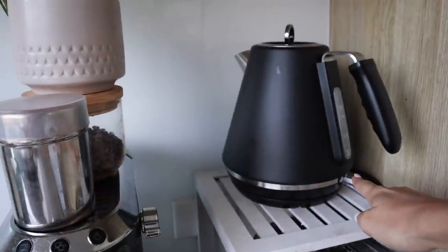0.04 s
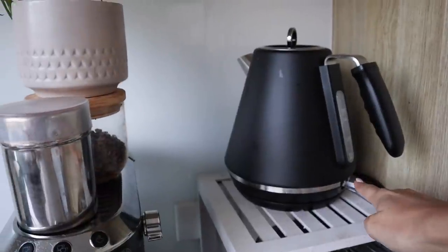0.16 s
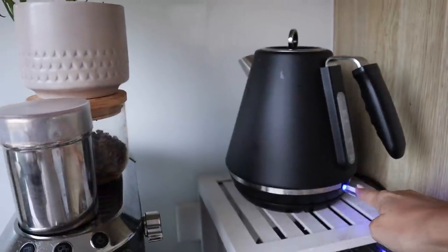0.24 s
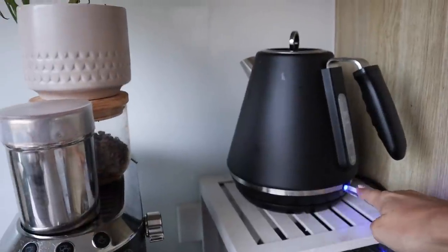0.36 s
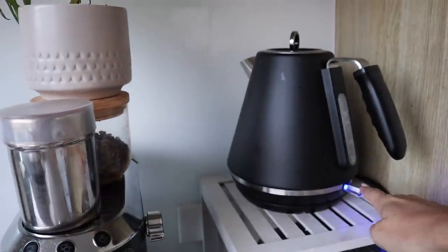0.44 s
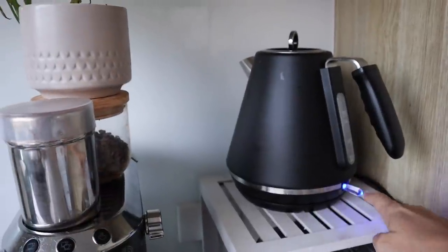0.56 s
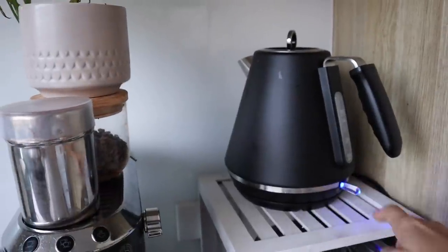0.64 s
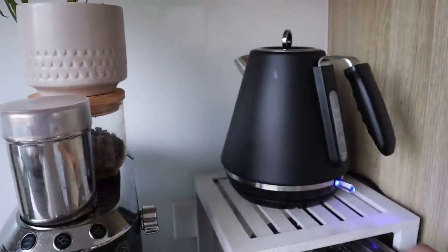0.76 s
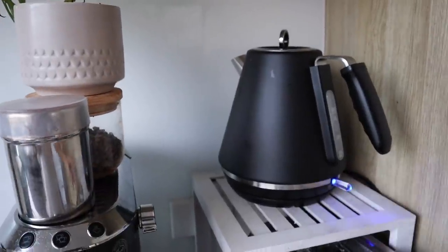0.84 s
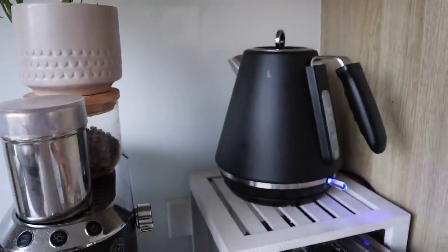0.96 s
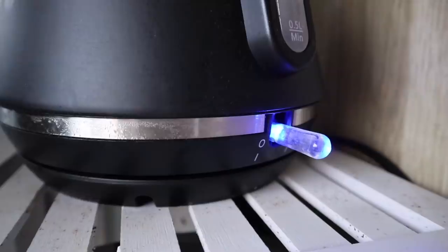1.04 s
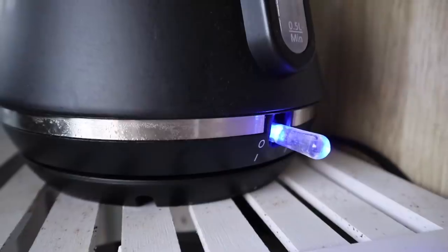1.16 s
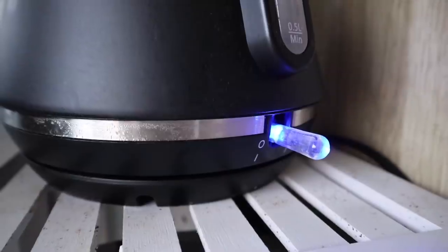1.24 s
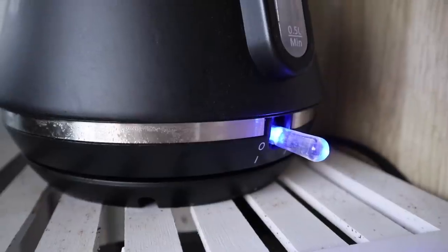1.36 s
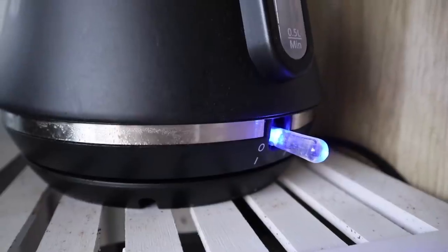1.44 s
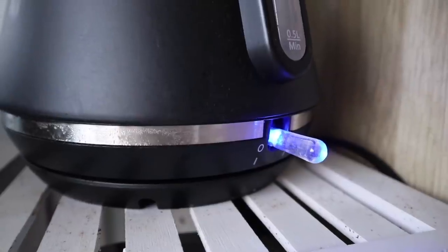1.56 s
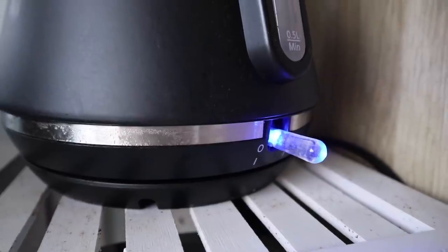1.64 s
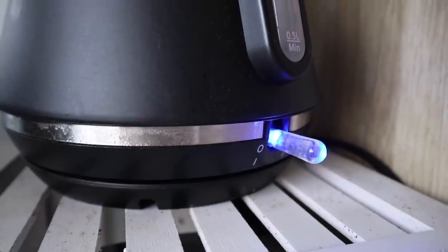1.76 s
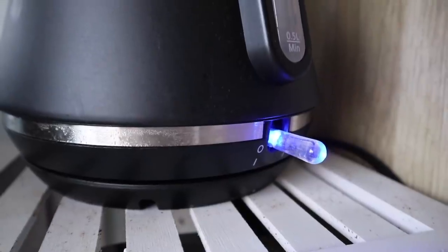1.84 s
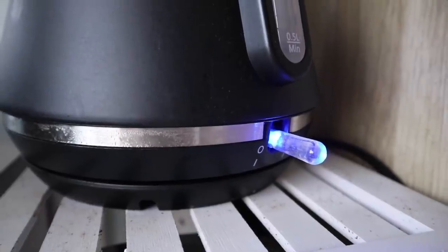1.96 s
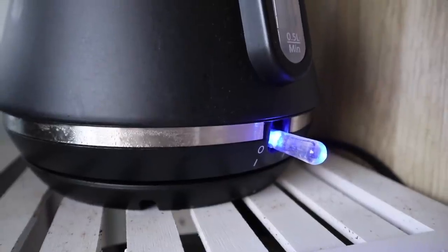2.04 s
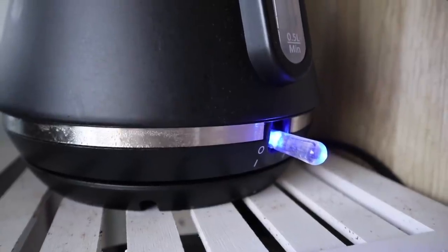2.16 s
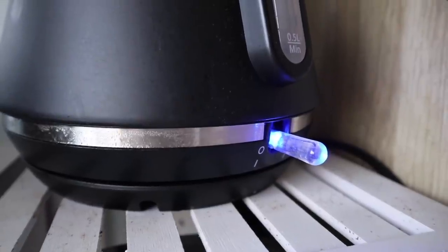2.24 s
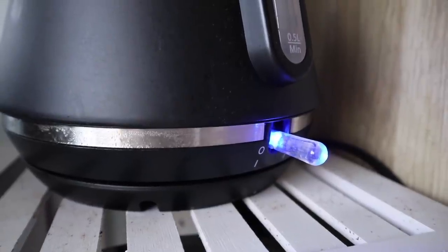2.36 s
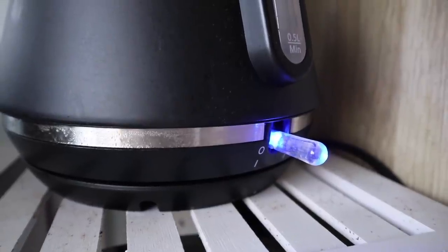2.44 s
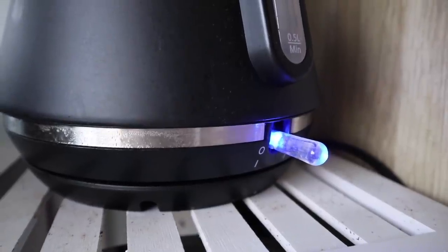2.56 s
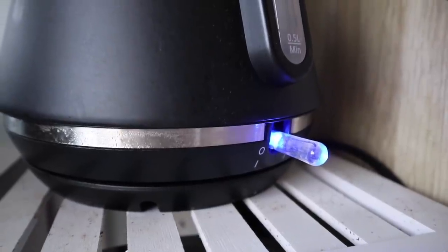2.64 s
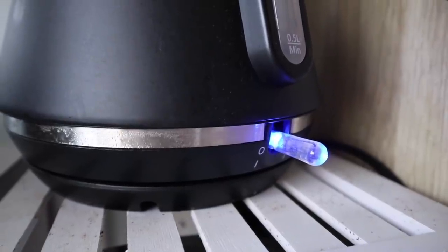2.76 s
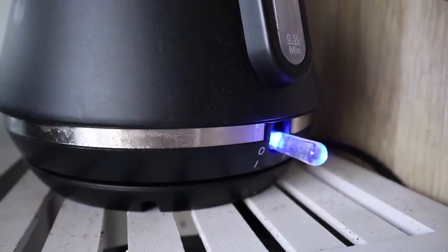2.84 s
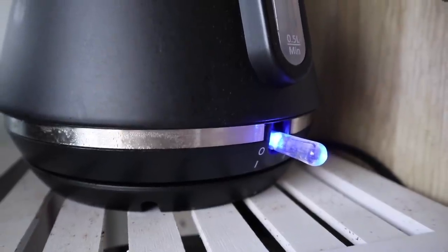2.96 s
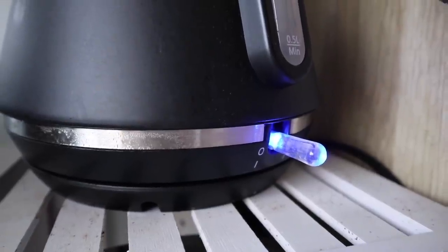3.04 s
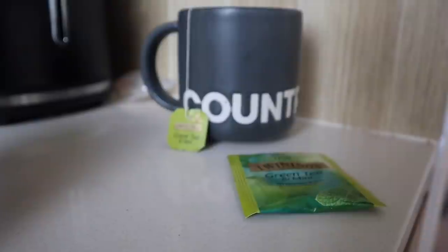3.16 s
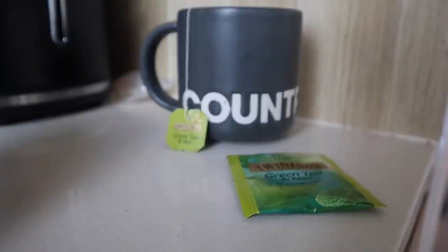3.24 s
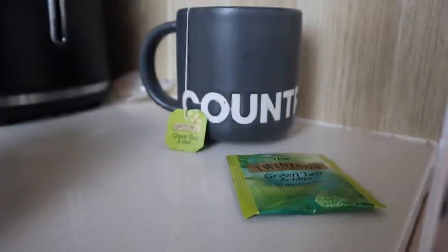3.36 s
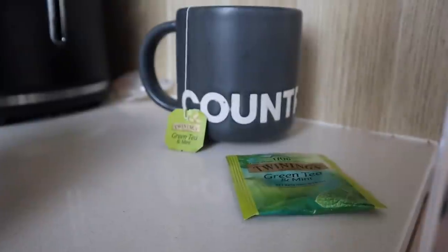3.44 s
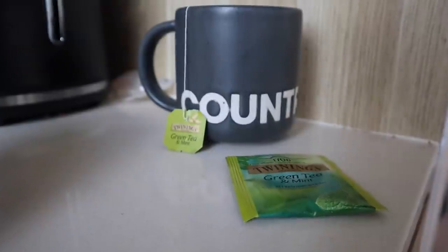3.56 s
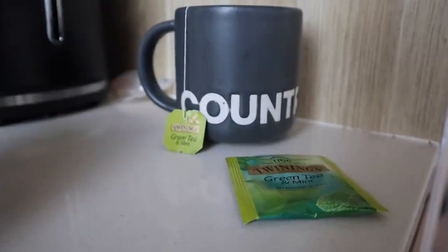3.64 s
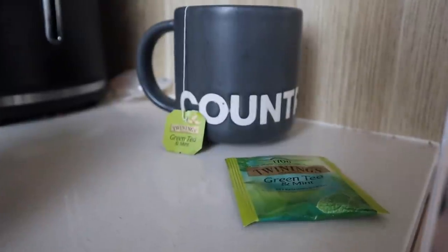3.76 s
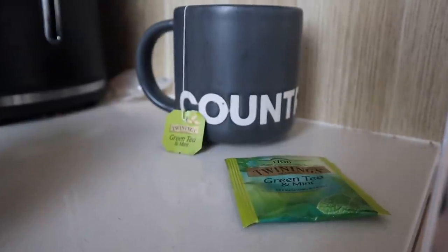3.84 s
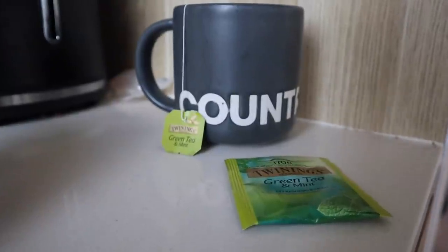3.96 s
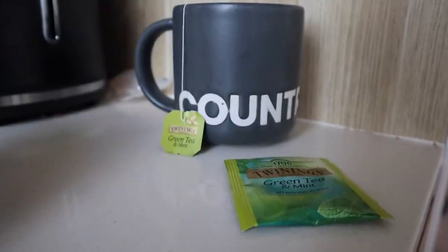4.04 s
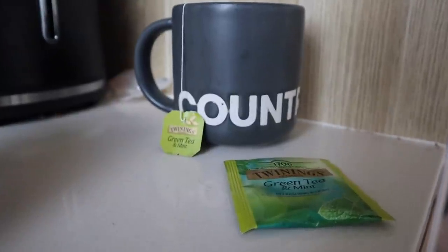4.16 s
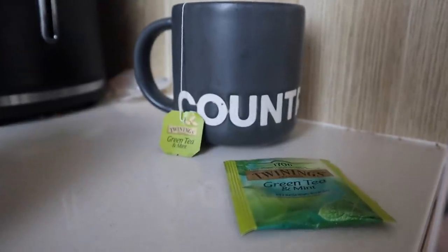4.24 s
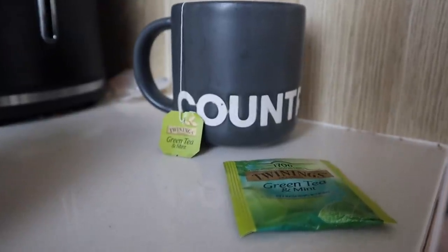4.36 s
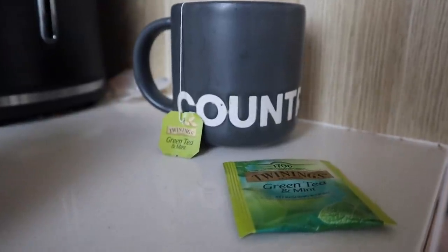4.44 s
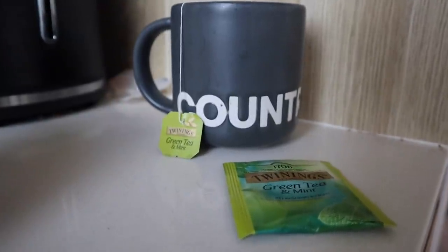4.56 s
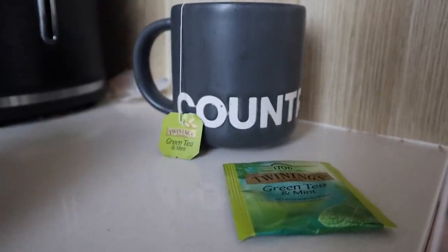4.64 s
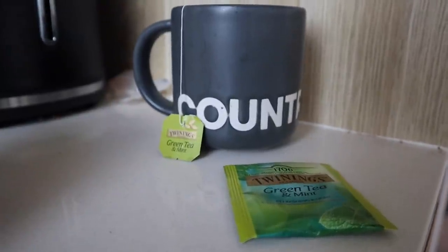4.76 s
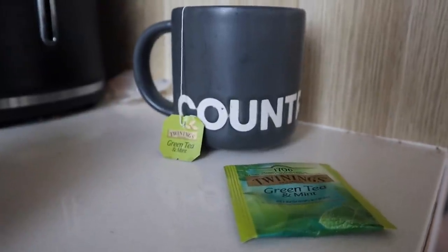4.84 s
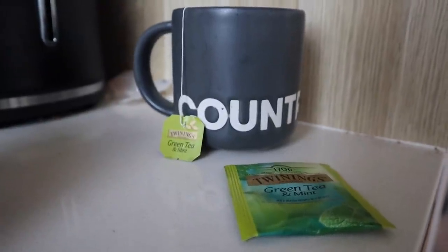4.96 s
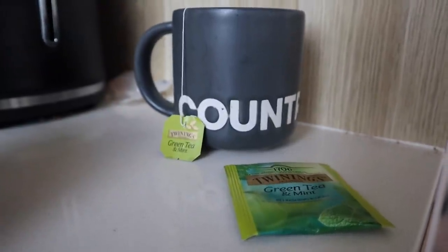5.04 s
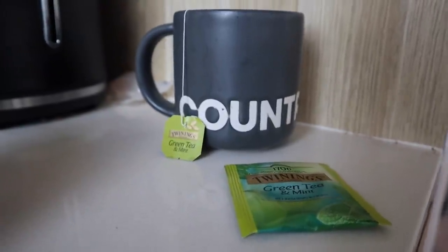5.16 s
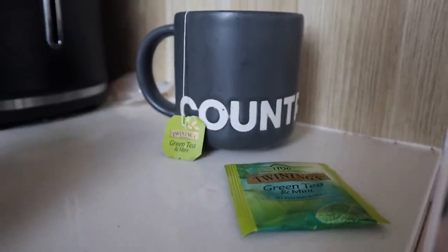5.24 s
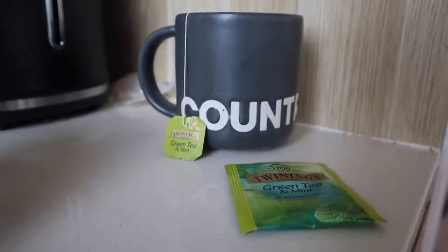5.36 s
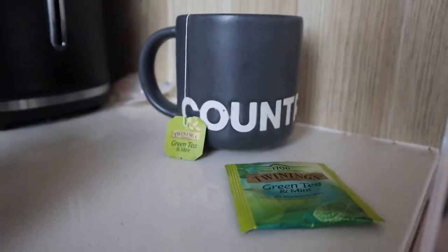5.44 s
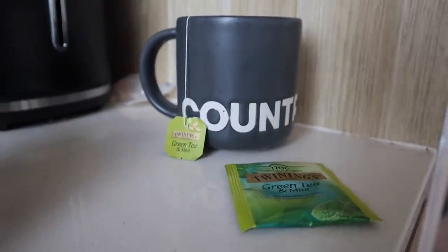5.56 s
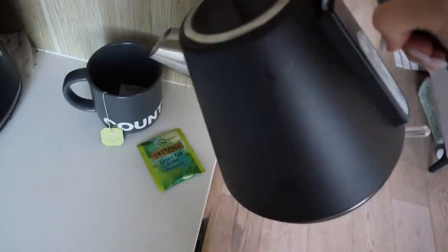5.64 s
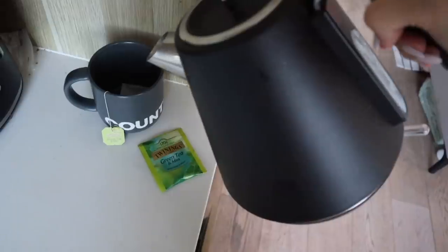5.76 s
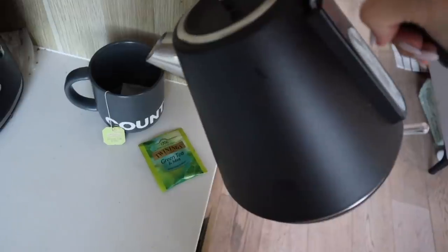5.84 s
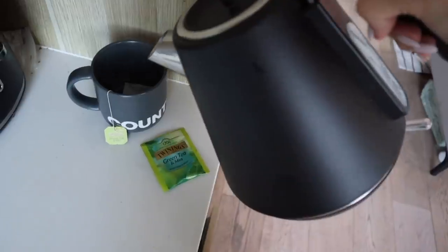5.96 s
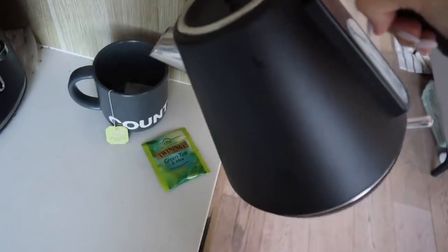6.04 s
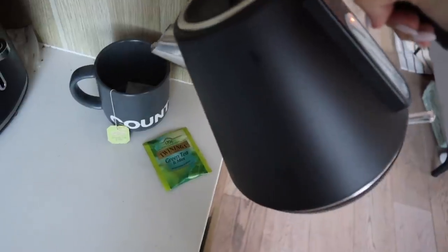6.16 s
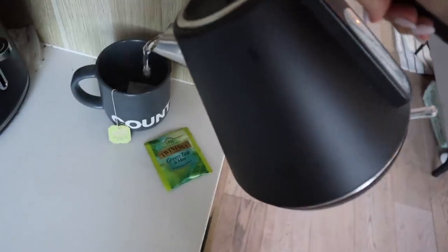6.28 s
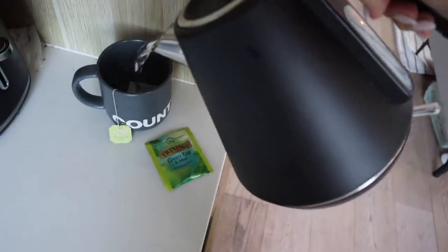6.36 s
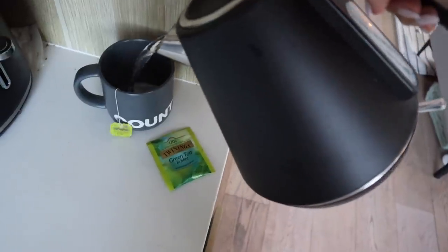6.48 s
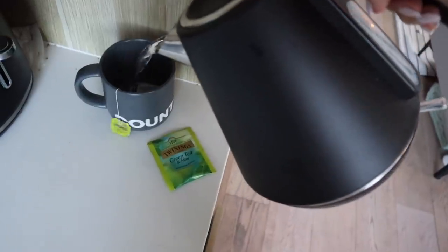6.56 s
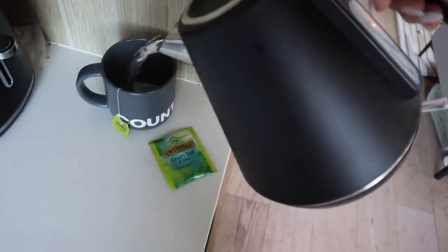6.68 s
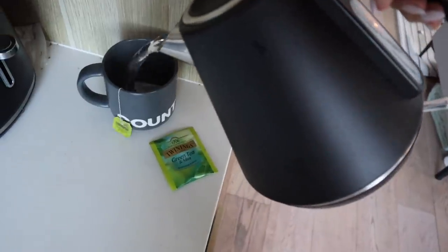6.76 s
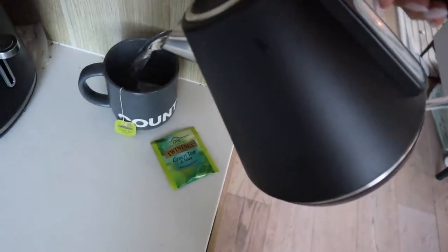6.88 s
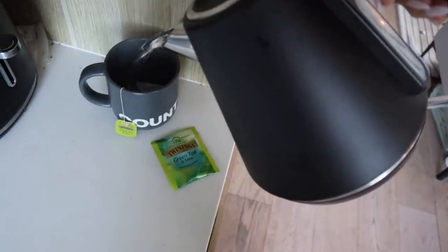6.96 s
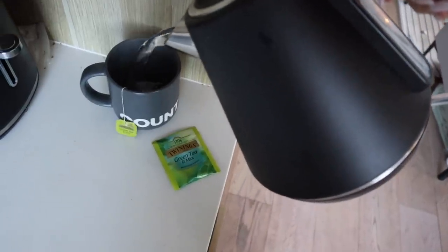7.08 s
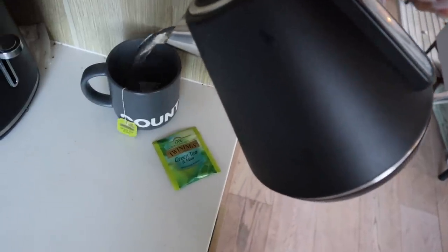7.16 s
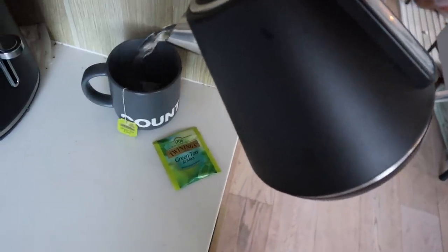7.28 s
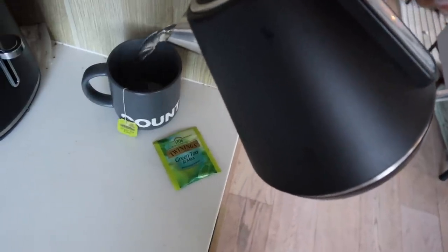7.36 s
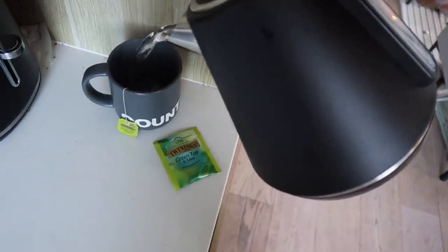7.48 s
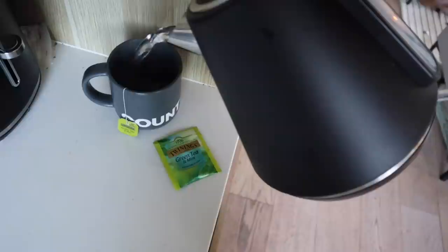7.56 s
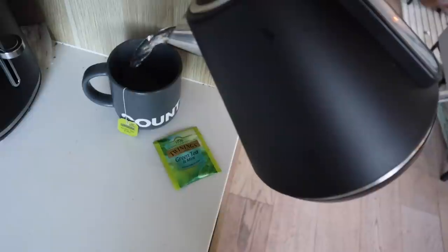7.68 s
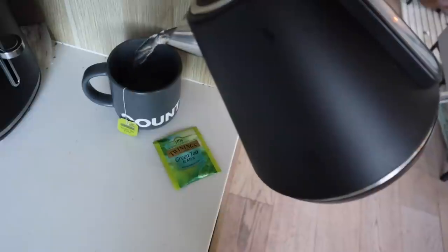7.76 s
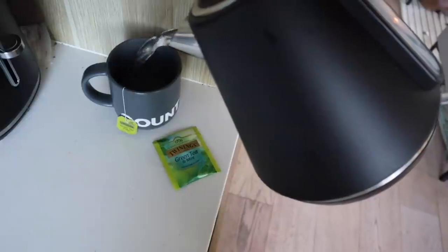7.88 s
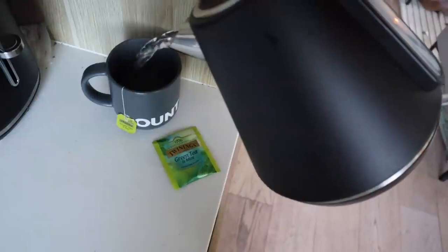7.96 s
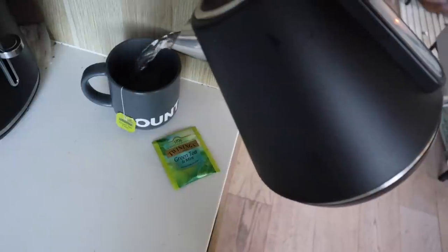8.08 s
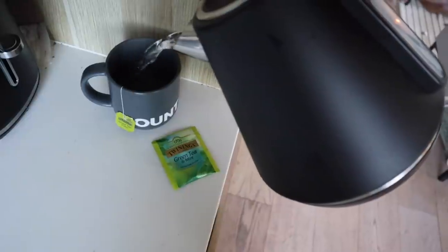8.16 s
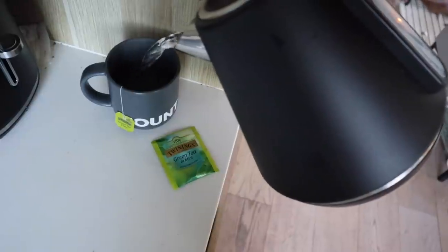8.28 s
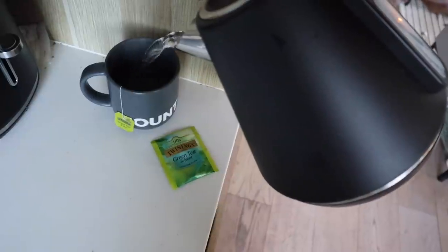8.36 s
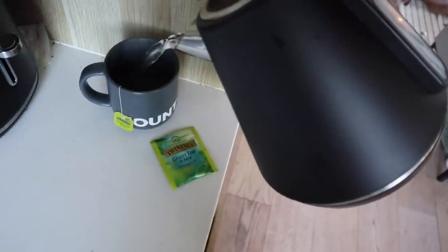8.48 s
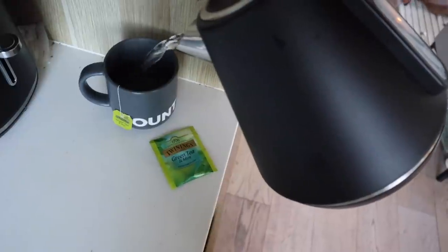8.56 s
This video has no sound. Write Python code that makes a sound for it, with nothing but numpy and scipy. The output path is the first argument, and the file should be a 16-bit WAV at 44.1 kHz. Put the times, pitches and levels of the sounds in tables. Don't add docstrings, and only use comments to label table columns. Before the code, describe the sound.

In a quiet home kitchen, faint plastic scrapes lead to one very loud switch snap with a short shelf rattle. A cut brings the kettle close: a jolting, shell-shaking boil that grows stronger. Another cut gives a steady roar from across the counter. It stops abruptly, leaving soft room tone before thin dribbles become a gulping, splashing pour into a ceramic mug, heard fairly close in one channel.

```python
import sys
import numpy as np
from scipy import signal
from scipy.fft import rfft, irfft, next_fast_len
from scipy.io import wavfile
from scipy.ndimage import uniform_filter1d, map_coordinates

SR = 44100
rng = np.random.default_rng(int(sys.argv[2]) if len(sys.argv) > 2 else 0)


def digitize_waveform(pressure):
    field = np.atleast_2d(pressure).T
    bounded = np.clip(field, -1, 1)
    quanta = np.round(bounded * 32767).astype(np.int16)
    wavfile.write(sys.argv[1], SR, quanta)


def volts_from_decibels(level):
    exponent = np.asarray(level, float) / 20
    return 10 ** exponent


N = 379991
T = np.arange(N) / SR

CUTS = [
    1.039,
    3.118,
    5.68,
]

# t/s, level/dB
HEAT = [(1.04, -30), (1.45, -26.5), (1.7, -23.5), (2.3, -20.5), (2.8, -18.5), (3.12, -18)]
# t/s, level over the boil/dB
SURGES = [(1.19, 3.5), (1.36, 4.5), (1.46, 6), (1.66, 5.5), (1.79, 4.5), (1.9, 3), (2.14, 3), (2.54, 3.5),
          (2.63, 3), (2.7, 0.5), (2.76, 1.5), (2.83, 5), (2.96, 2), (3.03, 5)]
SURGE_SHARE = [1.0, 0.64, 0.033]
# level over the vigour/dB, growth/(dB per dB)
NEAR_BANDS = [
    (-6.5, 1.32),
    (-1, 1.0),
    (-2, 0.8),
]
FAR_DB = [-20.5, -20, -26.7]
# f/Hz, width/Hz, level/dB
NEAR_MODES = [(490, 30, -2), (680, 33, 0), (1140, 48, -2.5), (1274, 30, -3), (1511, 50, -9),
              (2160, 78, -14), (2640, 120, -9), (2997, 31, -10), (3130, 130, -9.5), (3890, 55, -13),
              (4460, 250, -14), (5350, 700, -15), (6860, 70, -11), (7330, 150, -18), (8000, 76, -20),
              (8700, 600, -23)]
# f/Hz, width/Hz, level/dB
FAR_MODES = [(495, 21, -5), (678, 44, -1), (1270, 58, 0), (1860, 46, -13), (2420, 140, -16),
             (3100, 56, -16), (3720, 87, -16), (4470, 110, -15), (5040, 44, -16), (5480, 94, -14)]
# f/Hz, width/Hz, level/dB
BASE_MODES = [
    [(176, 53, -11.5), (218, 32, -5.5), (780, 32, -4.5), (14300, 900, -32)],
    [(170, 28, -2), (196, 33, -2), (327, 45, -9), (850, 21, -7), (113.5, 25, -16.5), (9100, 2900, -28)],
]
# f/Hz, level/(dB per Hz)
NEAR_RUSH = [(35, -58), (60, -36), (203, -3.5), (356, -19.5), (494, -4), (596, -10.5), (670, -2), (908, -9),
             (1120, -1), (1830, -15), (2670, -8.5), (5260, -11), (13100, -24), (16200, -39)]
# f/Hz, level/(dB per Hz)
FAR_RUSH = [(35, -73), (60, -109), (180, -0.5), (439, -17), (483, -5), (555, -14.5), (670, -5.5),
            (930, -16), (1260, -5), (1520, -17), (5520, -18.5), (6650, -28.5), (11400, -32), (16200, -50.5)]

# t/s, level/dB
FLOW = [(6.4, -75), (7.0, -89.5), (7.35, -54), (7.6, -59.5), (7.8, -57), (8.2, -52), (8.62, -55)]
# level over the stream/dB, growth/(dB per dB)
FLOW_BANDS = [
    (-1, 1.83),
    (-4.5, 0.42),
    (-1.5, 0.5),
]
# t/s, peak level/dB, f/Hz
GULPS = [(6.929, -46, 894), (6.977, -44, 746), (7.01, -44, 899), (7.04, -25.5, 880), (7.142, -50, 1240),
         (7.174, -50, 764), (7.2, -39, 1200), (7.304, -55, 703), (7.304, -43, 1060), (7.332, -36, 1220),
         (7.368, -25, 1180), (7.367, -21, 880), (7.4, -39, 1060), (7.463, -35, 1680), (7.491, -47, 920),
         (7.514, -50, 1000), (7.57, -40, 1400), (7.605, -48, 1010), (7.625, -42, 1110), (7.649, -23, 1040),
         (7.702, -27, 1040), (7.734, -30, 703), (7.733, -17, 1150), (7.764, -19, 970), (7.789, -46, 1040),
         (7.837, -19, 1070), (7.87, -27, 1110), (7.909, -38, 1200), (7.943, -27, 1230), (7.966, -37, 1090),
         (7.995, -37, 1410), (8.032, -29, 1070), (8.039, -29, 1100), (8.054, -25, 1090), (8.09, -27, 1010),
         (8.112, -20, 1130), (8.154, -19, 1060), (8.192, -17, 1100), (8.206, -20, 1050), (8.253, -20, 1100),
         (8.289, -31, 1100), (8.316, -18, 1150), (8.355, -24.5, 990), (8.383, -21, 1080),
         (8.436, -26, 1100), (8.455, -24.5, 1320), (8.49, -21, 1130), (8.502, -32, 1100),
         (8.536, -19, 1160), (8.561, -19, 750), (8.582, -21, 1090)]
# t/s, peak level/dB, f/Hz, t60/s
GLUGS = [(6.306, -45, 2670, .008), (6.443, -43, 850, 0.035), (6.539, -45, 836, 0.04),
         (7.041, -34, 1450, 0.02), (7.056, -37, 1660, 0.026), (7.813, -38, 1000, .015),
         (8.503, -30, 600, 0.017), (8.542, -31.5, 457, 0.043), (8.563, -29.5, 406, 0.029),
         (8.594, -32, 470, 0.031), (8.607, -21, 1150, 0.0064)]
# t/s, peak level/dB, f/Hz
SPLASHES = [(6.4432, -35, 3990), (6.5355, -28, 5170), (6.6657, -41, 3480), (6.6812, -43, 4370),
            (6.7336, -46, 3870), (6.766, -35, 3990), (6.9531, -34, 2870), (6.977, -23, 2740),
            (7.0454, -35, 4660), (7.1536, -47, 4220), (7.185, -48, 5770), (7.202, -35, 5740),
            (7.2344, -40, 2910), (7.3048, -34, 4460), (7.3048, -29, 3130), (7.3442, -30, 2910),
            (7.422, -31, 2800), (7.422, -26.5, 4340), (7.4649, -26.5, 2890), (7.5083, -31, 2820),
            (7.5467, -30, 4200), (7.5996, -28, 3010), (7.633, -41, 3220), (7.657, -19, 2990),
            (7.7004, -29, 3010), (7.7233, -27, 4450), (7.7343, -26, 2990), (7.7433, -24, 4190),
            (7.7627, -26, 3010), (7.8126, -31, 4220), (7.8131, -20.5, 4200), (7.9084, -39, 2980),
            (7.9423, -35, 3010), (7.9633, -25.5, 4410), (8.0137, -29, 4200), (8.0366, -36, 3380),
            (8.0745, -39, 3120), (8.106, -43, 3470), (8.1499, -45, 3840), (8.1499, -26, 4850),
            (8.1923, -20, 4320), (8.2282, -28, 4550), (8.2401, -28, 3530), (8.3165, -28, 4640),
            (8.3544, -31, 3020), (8.3823, -42, 3180), (8.4083, -40, 4300), (8.4267, -30, 3210),
            (8.4572, -29, 3170), (8.4896, -32, 3100), (8.539, -43, 3040), (8.546, -38, 3490),
            (8.5619, -30, 4410), (8.5928, -31, 3380)]
# t/s, peak level/dB, f/Hz
PATTER = [(7.298, -32, 3120), (7.3144, -35, 4620), (7.334, -31, 3620), (7.4114, -30, 3370),
          (7.4314, -36, 4220), (7.6657, -22, 3040), (7.6794, -33, 3020), (7.9744, -34, 4260),
          (7.9844, -30, 4200), (8.106, -35, 3480), (8.2334, -30, 3530), (8.2464, -31, 3650),
          (8.2534, -32, 4140), (8.263, -29, 4130), (8.3294, -33, 3450), (8.3604, -38, 2900),
          (8.3704, -36, 3490), (8.4364, -34, 3390), (8.5535, -29, 3500)]
# t/s, peak level/dB, f/Hz
SPITS = [(6.446, -32, 8700), (6.5363, -22, 8360), (6.6933, -35, 9000), (6.9783, -38, 8320),
         (7.0065, -33, 7660), (7.054, -30, 13400), (7.0977, -44, 8020), (7.1831, -39, 7970),
         (7.202, -31, 6960), (7.2429, -39, 8530), (7.2624, -40, 8190), (7.3043, -43.5, 8120),
         (7.3357, -29, 8190), (7.3661, -34, 8120), (7.411, -34, 11900), (7.447, -46, 9420),
         (7.4644, -41, 6500), (7.4814, -30, 7900), (7.504, -26, 8100), (7.5454, -35, 8000),
         (7.6005, -39, 8200), (7.664, -42, 6500), (7.664, -20.5, 8050), (7.6903, -26, 8060),
         (7.7233, -33, 9350), (7.7363, -34, 8030), (7.7627, -25, 8130), (7.8131, -40, 6500),
         (7.8195, -27, 6540), (7.832, -29, 7290), (7.8949, -35, 7470), (7.9318, -32, 7940),
         (7.938, -29, 8170), (7.9633, -35, 12200), (7.9945, -34, 8130), (8.0142, -35, 7200),
         (8.0291, -28, 7270), (8.0845, -43, 8310), (8.088, -25, 9370), (8.1214, -40, 7550),
         (8.1499, -47, 10500), (8.1499, -28, 7010), (8.1982, -41, 8960), (8.1982, -15, 7550),
         (8.2072, -22, 9730), (8.2591, -32, 9290), (8.2594, -27, 7640), (8.3155, -34, 8120),
         (8.33, -30, 8000), (8.355, -25, 7630), (8.3714, -34, 7500), (8.412, -23.5, 7900),
         (8.4337, -31, 7260), (8.4567, -32, 6800), (8.4891, -43, 7560), (8.538, -43, 8700),
         (8.538, -37, 7500), (8.5699, -33, 7700), (8.571, -32, 8440), (8.5935, -18, 7900)]
# t/s, peak level/dB, f/Hz
TICKS = [(7.3244, -31, 9380), (7.3444, -36, 8190), (7.8614, -35, 12300), (7.8674, -33, 9340),
         (7.943, -32, 8190), (7.9714, -33, 12300), (8.0204, -35, 8210), (8.0914, -30, 12700),
         (8.1444, -29, 8200), (8.1937, -23, 8500), (8.2624, -25, 9330), (8.2704, -29, 8350),
         (8.2884, -31, 14300), (8.3234, -29, 9530), (8.5464, -40, 8000), (8.5614, -31, 8080),
         (8.6064, -38, 8650)]
# f/Hz, width/Hz, level/dB
MUG = [
    [(1110, 120, 0), (1050, 160, -3), (1450, 350, -8), (850, 200, -8)],
    [(4400, 800, 0), (3100, 300, -2), (3650, 400, -2), (5700, 700, -4)],
    [(7600, 900, 0), (8300, 800, 0), (9800, 1600, -2), (12800, 3500, -4)],
]
TAP_DB = [
    (-13, -4, -9),
    (-12, -9, -6),
    (-16, -10, -12),
]
# t/s, f/Hz, level/dB, t60/s
CHIME = [(6.978, 2750, -42, .07), (6.99, 2500, -60, .8), (7.306, 2500, -42, .4), (7.305, 3100, -35, .03),
         (7.306, 4850, -58, .25), (6.0, 3330, -69, 6.0), (6.445, 2700, -62, .5)]

# t/s, level/dB, t60/s
TOUCH = [(0.188, -35.5, 0.058), (.215, -45, 0.096), (.241, -38, .07), (0.266, -30, 0.09),
         (0.274, -37, 0.08)]
# t/s, level/dB
SNAP = [
    (.2885, -2),
    (.2905, -3),
    (.2925, -6),
    (.2945, -6),
    (.2995, -13),
]
# f/Hz, level/dB, t60/s
LEVER = [(196, -3, 0.084), (535, -13.5, 0.15), (773, 6, 0.094), (1090, -27, 0.071), (1960, -3.5, 0.044),
         (2360, -27.5, 0.065), (2135, 3, 0.039), (2900, -9.5, 0.03), (3472, -42, 0.073),
         (4151, -37.5, 0.06), (5700, -23, 0.03), (7600, -24, 0.046), (7827, -32, 0.032)]
# f/Hz, level/(dB per Hz)
CRACK = [(71, -54), (120, -53), (773, 2), (2930, -13.5), (4230, -20), (5410, -15), (6370, -39),
         (7820, -20.5), (16000, -29)]
# f/Hz, level/(dB per Hz)
SHELF = [(88, -28), (150, 14), (280, -9.5), (589, 3.5), (1660, -8.5), (2220, -25), (2900, -25), (8070, -24),
         (16000, -28)]
# f/Hz, width/Hz, level/dB
SLATS = [(700, 180, -1), (1150, 150, 1), (2280, 200, 3), (5400, 150, -11)]

# t/s, peak level/dB, f/Hz, t60/s
THUMPS = [(8.56, -21, 28, .12), (1.29, -25, 45, 0.17), (3.112, -38, 93, 0.06), (1.786, -11, 1950, .012)]
# f/Hz, t60/s
KITCHEN = [(150, 0.35), (1000, 0.35), (4000, 0.49), (12000, 0.018)]
# f/Hz, level/(dB per Hz)
ROOM_TONE = [
    [(8.8, -31), (15, -1), (48, -24), (75, -15.5), (196, -7.5), (241, -16.5), (287, -5), (408, -13.5),
     (530, -11.5), (3000, -29.5), (8000, -32.5), (14800, -34), (16200, -38)],
    [(8.8, -29), (15, -16), (75, -21), (165, -17), (287, -11.5), (323, -12.5), (385, -15.5), (846, -20.5),
     (924, -20.5), (1610, -30), (16200, -42)],
]
ROOM_DB = [-49.5, -48]
RUMBLE_DB = [-53, -53, -48.5, -58]


def kettle():
    surge_s = 0.02
    jolt_db = sum(db * np.exp(-((T - s) / surge_s) ** 2) for s, db in SURGES)
    boil = driven(HEAT, NEAR_BANDS)
    gains = [gain * volts_from_decibels(share * jolt_db) for gain, share in zip(boil, SURGE_SHARE)]
    near = roar(NEAR_MODES + BASE_MODES[0], NEAR_RUSH, -8.0, gains)
    near = filtered(near, lambda f: 1 - 0.5 / (1 + ((f - 7350) / 520) ** 4))

    cold_db, cold_until_s, cold_fade_s = -35, 2.07, 0.4
    cold = shaped_noise(lambda f: resonant([(164.5, 21, 0)])(f) ** 2)
    near = near + cold * volts_from_decibels(cold_db + 1.4 * jolt_db) / (1 + np.exp((T - cold_until_s) / cold_fade_s))

    far = roar(FAR_MODES + BASE_MODES[1], FAR_RUSH, 0.21, volts_from_decibels(np.array(FAR_DB)))
    return shot(CUTS[0], CUTS[1] + 0.0012) * near + shot(CUTS[1], CUTS[2]) * far


def roar(modes, rush, rush_db, gains):
    collapse = grains(6000, spread_db=-2.0) * volts_from_decibels(0.14 * wobble(30) + 0.049 * wobble(7))
    collapse = collapse + volts_from_decibels(-15) * unit(room(collapse))

    def power(f):
        ringing = sum(volts_from_decibels(2 * db) / (1 + (2 * (f - c) / w) ** 2) ** 2.6 for c, w, db in modes)
        return volts_from_decibels(2 * (along(rush, f) + rush_db)) + ringing

    edges_hz = [0, 420, 2000, SR]
    out = 0
    for low, high, gain in zip(edges_hz, edges_hz[1:], gains):
        band = filtered(collapse, lambda f: np.sqrt(power(f)) * (f >= low) * (f < high))
        out = out + gain * volts_from_decibels(0.36 * wobble(9)) * unit(band)
    return out


def pour():
    water = lumps() + stream()
    for rows, levels_db in zip([GULPS, SPLASHES, SPITS], TAP_DB):
        water = water + taps(rows, levels_db)
    water = filtered(water, lambda f: 1 - 0.58 / (1 + ((f - 2340) / 260) ** 4))
    water = water + chime()
    return water + volts_from_decibels(-14) * room(water)


def lumps():
    gulp_t60_s, partner_db = 0.026, -9
    bubbles = [(*row, gulp_t60_s) for row in GULPS]
    for (s, db, hz), (a, b) in zip(GULPS, rng.random((len(GULPS), 2))):
        ratio = 1.35 + 0.19 * (b - 0.5)
        bubbles.append((s + 0.00416 * a, db + partner_db, hz * ratio, gulp_t60_s))
    gulps = volts_from_decibels(-2.0) * drops(bubbles, rise=2.1, rough=0.25)
    glugs = volts_from_decibels(5.5) * drops(GLUGS, rise=3.1, rough=0.11)
    splashes = volts_from_decibels(0.5) * drops([(*row, 0.0055) for row in SPLASHES + PATTER], rise=7.2, rough=0.43)
    spits = volts_from_decibels(-2.5) * drops([(*row, 0.005) for row in SPITS + TICKS], rise=5.5, rough=0.8)
    return gulps + glugs + splashes + spits


def stream():
    trails = [volts_from_decibels(-19) * spray(GULPS, 0.05), volts_from_decibels(-17) * spray(SPLASHES, 0.07), volts_from_decibels(-18) * spray(SPITS, 0.05)]
    small = [droplets(MUG[0], 0.018, 1.5, hiss=0.1, ticks=0.1, count=320),
             droplets(MUG[1], 0.006, 1.8, hiss=0.2, ticks=0.3, count=800),
             droplets(MUG[2], 0.004, 1.8, hiss=0.3, ticks=0.4, count=900)]
    flowing = np.clip((T - FLOW[0][0]) / 0.5, 0, 1) * volts_from_decibels(3 * wobble(30))
    gains = driven(FLOW, FLOW_BANDS)
    return sum((flowing * gain + trail) * d for gain, trail, d in zip(gains, trails, small))


def drops(rows, rise, rough):
    s, db, hz, t60 = np.transpose(rows)[..., None]
    step = np.arange(round(min(t60.max(), 0.05) * SR))
    t = step / SR
    noise = uniform_filter1d(rng.standard_normal((len(rows), 2205)), size=5, axis=1)
    shake = 1 + 2 * rough * noise[:, step]
    envelope = (1 - np.exp(-t * hz)) * volts_from_decibels(db - 60 * t / t60)
    tone = np.sin(2 * np.pi * hz * t * (1 + rise * t)) * envelope
    place = np.round(s * SR).astype(int) + step
    return np.bincount(place.ravel(), (tone * shake).ravel(), 2 * N)[:N]


def spray(rows, t60):
    kicks = np.zeros(N)
    for s, db, *_ in rows:
        kicks[round(s * SR)] += volts_from_decibels(db)
    return signal.fftconvolve(kicks, volts_from_decibels(-60 * T[:SR // 2] / t60))[:N]


def droplets(modes, t60, spread_db, hiss, ticks, count):
    when, which, size, detune = rng.random((count, 4)).T
    hz, width, db = np.array(modes)[(which ** 2 * len(modes)).astype(int)].T
    start = FLOW[0][0]
    s = start + when * (N / SR - start)
    level = db - spread_db * np.log(size + 0.04)
    rows = np.c_[s, level, hz + 1.5 * width * (detune - 0.5), np.full(count, t60)]
    running = unit(drops(rows, rise=1.1, rough=0.41)) * np.sqrt(1 - start * SR / N)
    exciter = hiss * rng.standard_normal(N) + ticks * grains(200, spread_db=0.0)
    return running + np.hypot(hiss, ticks) * unit(filtered(exciter, resonant(modes)))


def taps(rows, levels_db):
    s, db = np.array(rows)[:, :2].T
    clicks = np.zeros(N)
    clicks[np.round(s * SR).astype(int)] = volts_from_decibels(db)
    return sum(volts_from_decibels(level) * filtered(clicks, resonant(modes)) for level, modes in zip(levels_db, MUG))


def chime():
    out = np.zeros(N)
    for s, hz, db, t60 in CHIME:
        out += (T > s) * volts_from_decibels(db - 60 * abs(T - s) / t60) * np.sin(2 * np.pi * hz * T)
    return out * volts_from_decibels(1.5 * wobble(45))


def switch():
    out, t = np.zeros(N), np.arange(SR // 3) / SR
    for s, db, t60 in TOUCH:
        out[round(s * SR):][:len(t)] += volts_from_decibels(db) * crack(t, t60)
    for s, db in SNAP:
        ring = np.zeros(len(t))
        for hz, level, t60 in LEVER:
            ring += volts_from_decibels(level + rng.normal(0, 2.7) - 60 * t / t60) * np.sin(2 * np.pi * hz * t)
        out[round(s * SR):][:len(t)] += volts_from_decibels(db) * (volts_from_decibels(-11.5) * ring + volts_from_decibels(-2.5) * crack(t, 0.024))
    out = out + volts_from_decibels(-23) * room(out)

    since = T - SNAP[0][0]
    rattle = shaped_noise(lambda f: volts_from_decibels(along(SHELF, f)) + 0.77 * abs(resonant(SLATS)(f)))
    rattle = rattle * volts_from_decibels(2.1 * wobble(128.0)) * volts_from_decibels(-20.0 - 60 * abs(since) / 0.38)
    contact_spring = volts_from_decibels(-35 - 60 * abs(since) / 0.32) * np.sin(2 * np.pi * 7830 * T)
    out = out + (since > 0) * (rattle + contact_spring)
    return filtered(out, lambda f: (1j * f / (1j * f + 135)) ** 4)


def crack(t, t60):
    return shaped_noise(lambda f: volts_from_decibels(along(CRACK, f)), len(t)) * volts_from_decibels(-60 * t / t60)


def background():
    tones = []
    for colour, db in zip(ROOM_TONE, ROOM_DB):
        noise = shaped_noise(lambda f: volts_from_decibels(along(colour, f)) * (f > 48))
        tones.append(volts_from_decibels(db + 0.6 * wobble(4.0)) * noise)
    tone = np.where(T < CUTS[2], tones[0], tones[1])

    steps_db = np.array(RUMBLE_DB, float)[np.searchsorted(CUTS, T)]
    rumble_db = uniform_filter1d(steps_db, size=SR // 20) + 1.83 * wobble(2.84)
    rumble = volts_from_decibels(rumble_db) * shaped_noise(lambda f: resonant([(25, 24, 0)])(f) ** 2)
    return volts_from_decibels(-1.5) * tone + rumble + low_hum()


def low_hum():
    hum_hz, sag_hz_per_s = 71.6, 2.9
    t = np.clip(T - CUTS[2], 0, None)
    level = volts_from_decibels(-60) + volts_from_decibels(-56) * np.exp(-((T - 6.48) / 0.32) ** 2)
    dropout = 1 - np.exp(-((T - 7.95) / 0.06) ** 2)
    level = level * np.clip(t / 0.3, 0, 1) * dropout
    phase = 2 * np.pi * (hum_hz - sag_hz_per_s * t / 2) * t + 1.6 * wobble(7.5)
    return level * np.sqrt(2) * np.sin(phase)


def room(x):
    hz, t, z = signal.stft(rng.standard_normal(SR // 2), SR, nperseg=256)
    fade = volts_from_decibels(-60 * t / along(KITCHEN, hz)[:, None])
    tail = signal.istft(z * fade, SR, nperseg=256)[1]
    delayed = np.pad(x, (300, 0))
    return signal.fftconvolve(delayed, tail / np.linalg.norm(tail))[:N]


def shot(start, end):
    return np.clip((T - start) / 0.00041, 0, 1) * np.clip((end - T) / 0.0037, 0, 1)


def driven(control, bands):
    s, db = np.transpose(control)
    swing = np.interp(T, s, db) - db.mean()
    return [volts_from_decibels(db.mean() + over_db + grows * swing) for over_db, grows in bands]


def grains(rate, spread_db):
    hit, size, sign = rng.random(N), rng.exponential(size=N), rng.standard_normal(N)
    return unit((hit < rate / SR) * volts_from_decibels(spread_db * size) * sign)


def shaped_noise(response, length=N):
    return unit(filtered(rng.standard_normal(length), response))


def resonant(modes):
    def response(f):
        total = 0
        for k, (c, w, db) in enumerate(modes):
            total = total + (-1) ** k * volts_from_decibels(db) * 1j * f * w / (c * c - f * f + 1j * f * w)
        return total
    return response


def filtered(x, response):
    m = next_fast_len(len(x) + SR // 2)
    return irfft(rfft(x, m) * response(np.fft.rfftfreq(m, 1 / SR)), m)[:len(x)]


def wobble(rate):
    return map_coordinates(rng.standard_normal(int(N * rate / SR) + 4), [T * rate])


def along(points, hz):
    f, v = np.transpose(points)
    return np.interp(np.log(hz + 1), np.log(f + 1), v)


def unit(x):
    return x / np.sqrt(np.mean(x ** 2) + 1e-20)


def scene():
    thumps = drops(THUMPS, rise=0, rough=0)
    return (switch() + kettle() + pour() + background() + thumps)[None]


def top_cut(x):
    return signal.sosfilt(signal.butter(12, 16500, fs=SR, output="sos"), x)


def record(dry):
    held = dry / (1 + abs(dry / 0.97) ** 8) ** (1 / 8)
    mix = filtered(held[0], lambda f: f < 15950)[None]
    return top_cut(mix)


dry = scene()
out = record(dry)
digitize_waveform(out)
```